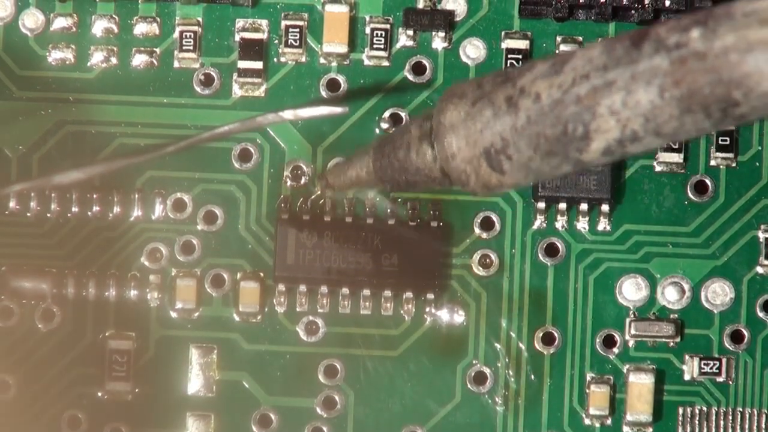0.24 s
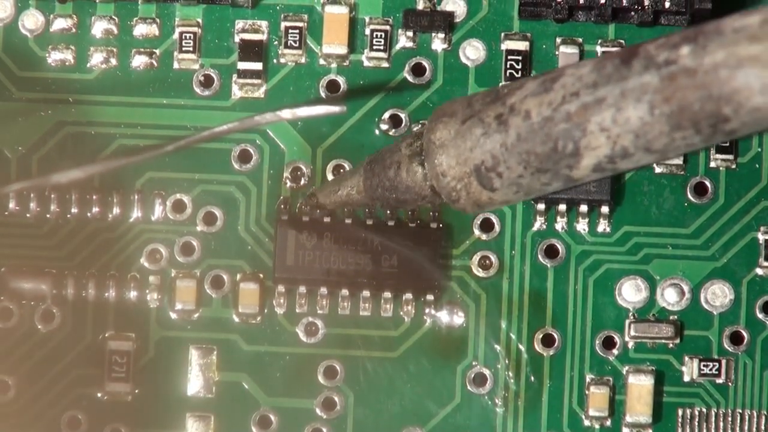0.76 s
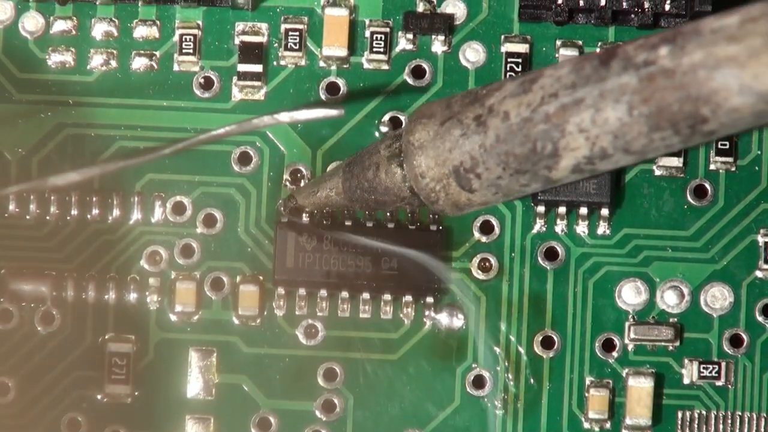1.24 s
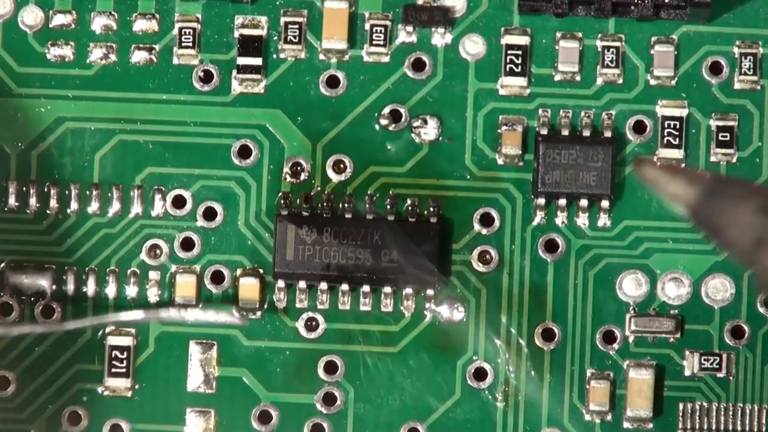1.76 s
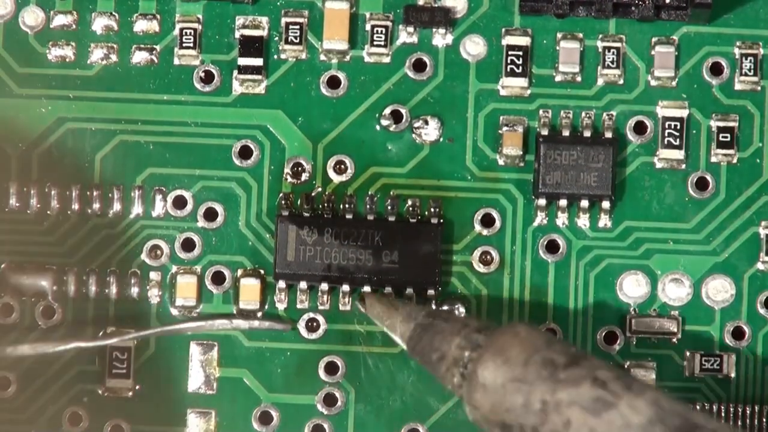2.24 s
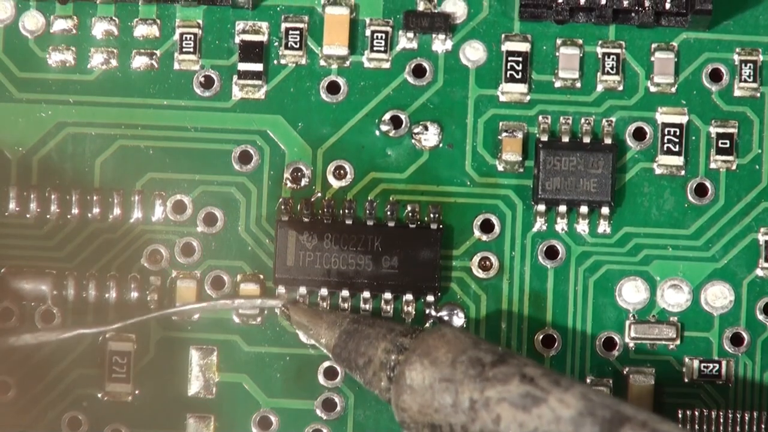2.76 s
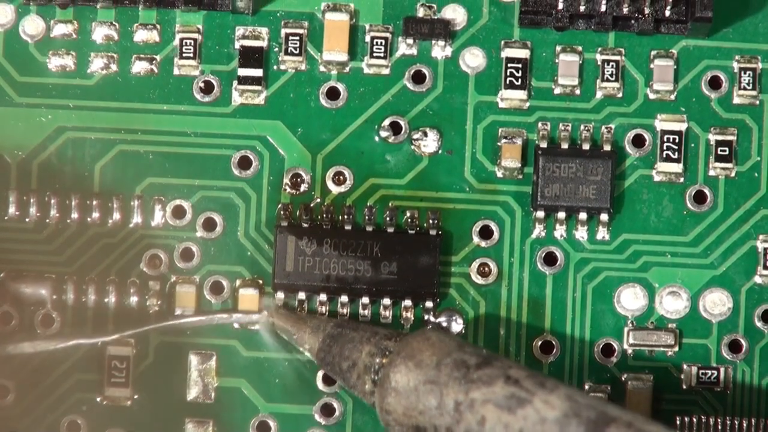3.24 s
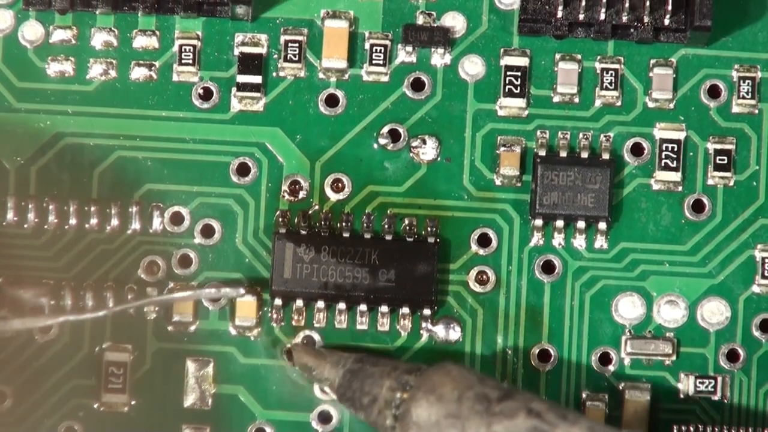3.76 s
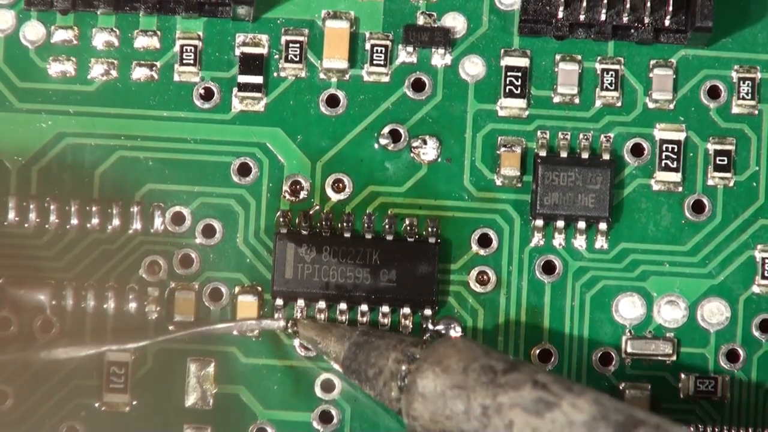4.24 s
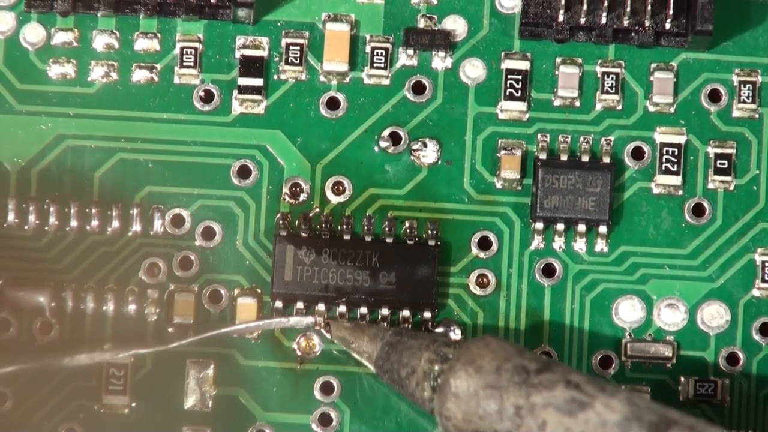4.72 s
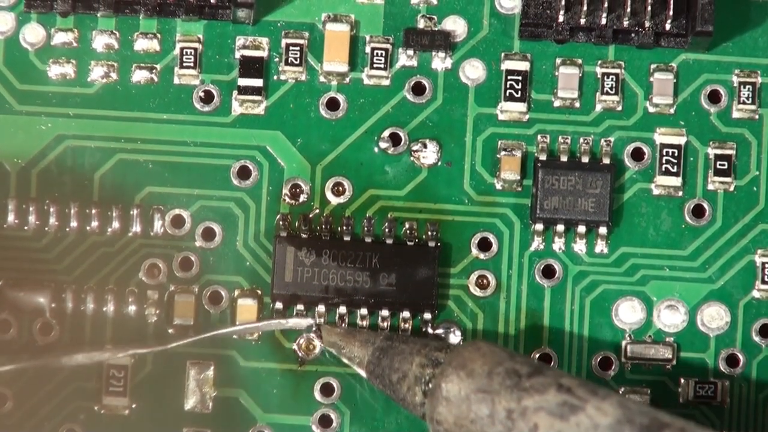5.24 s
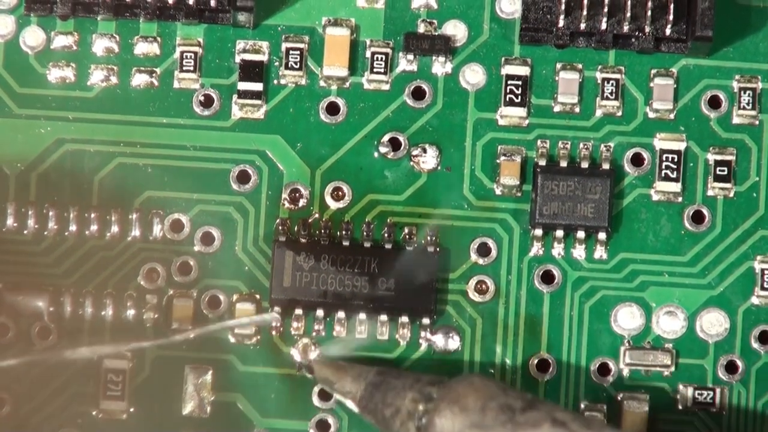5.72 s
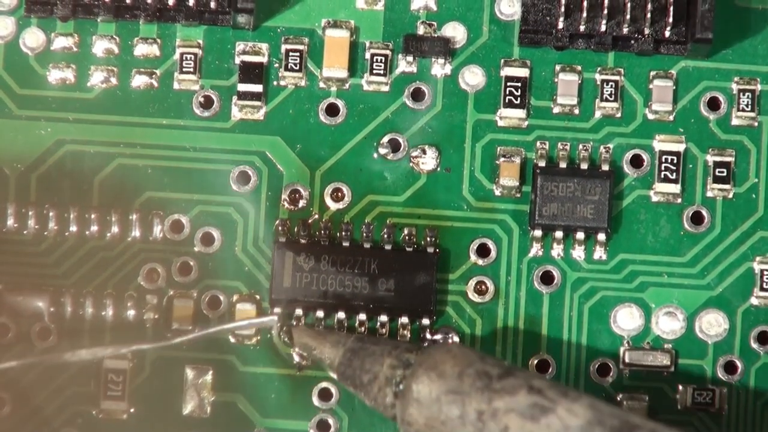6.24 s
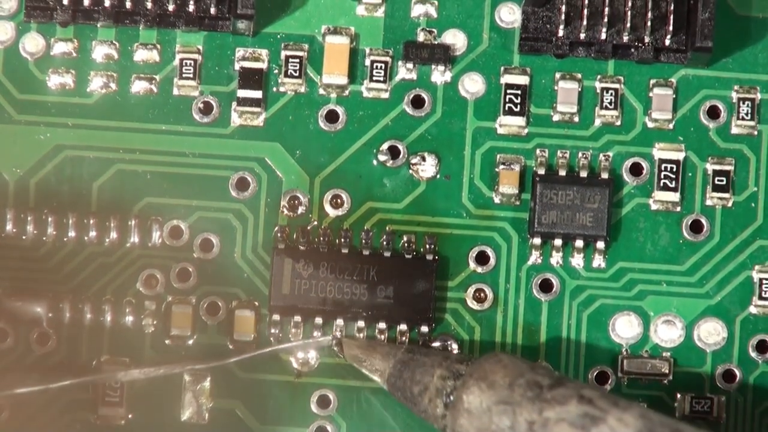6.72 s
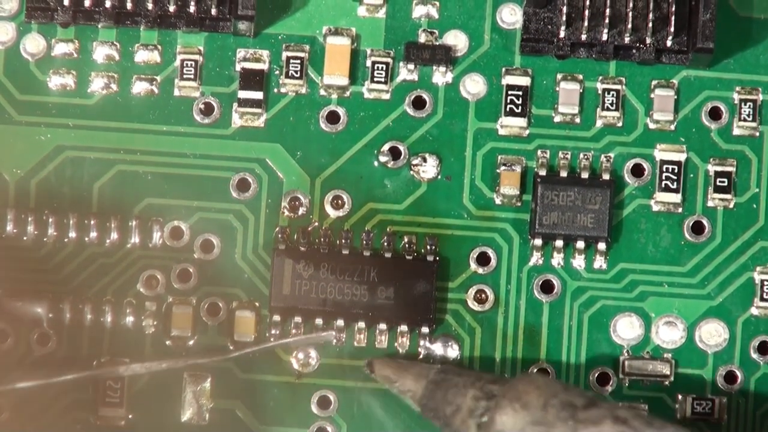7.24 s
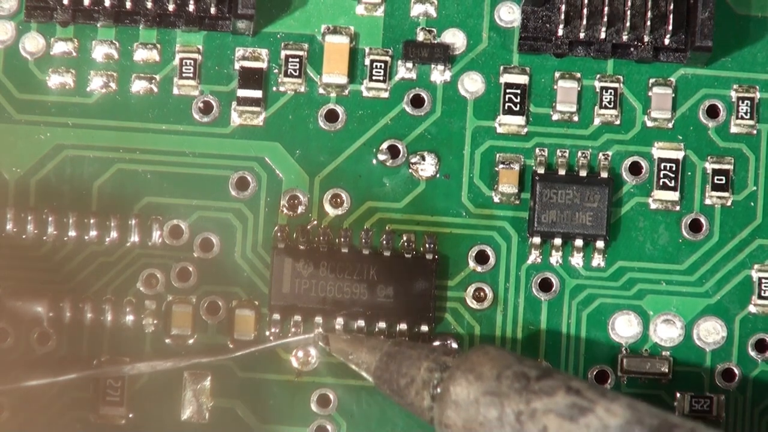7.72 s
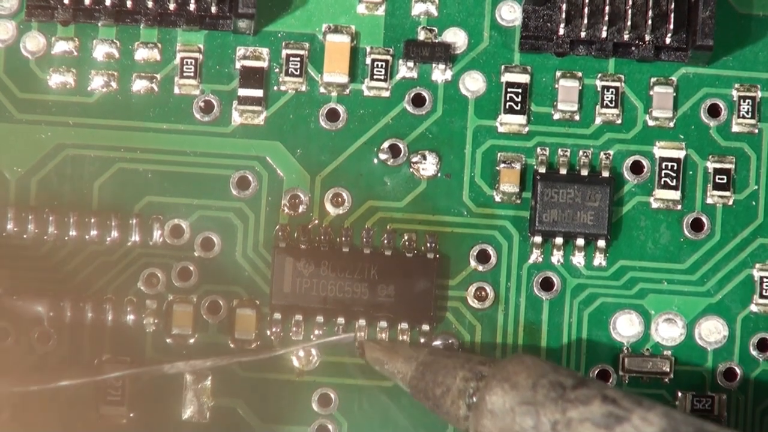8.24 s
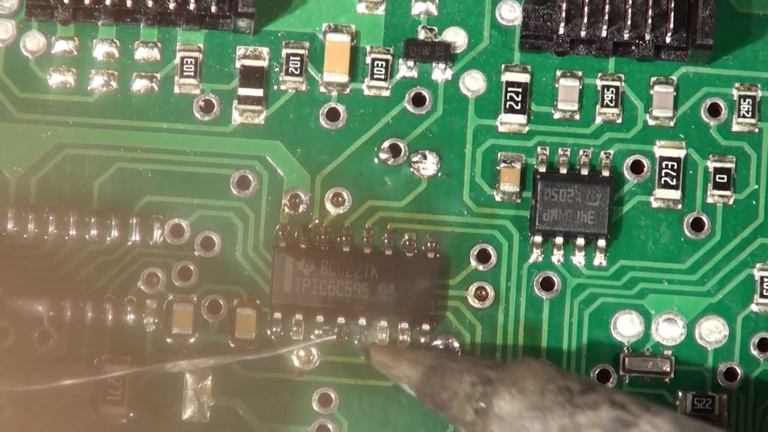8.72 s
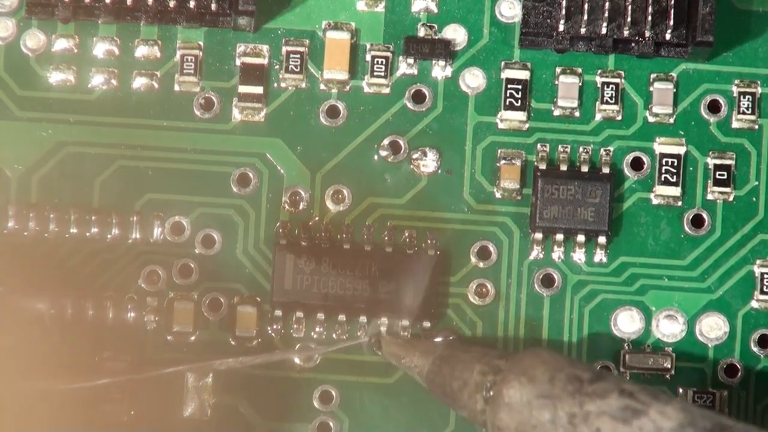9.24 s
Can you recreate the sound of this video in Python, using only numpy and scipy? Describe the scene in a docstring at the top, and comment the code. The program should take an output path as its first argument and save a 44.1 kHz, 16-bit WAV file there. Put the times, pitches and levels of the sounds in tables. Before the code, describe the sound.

Constant low electrical buzzing in a quiet room while a metal tip clicks lightly against chip pins, with one short flux fizz.

```python
"""Soldering at a bench

A mains transformer hums and buzzes over the hiss of the room and the microphone: steady tones over shaped noise.
The iron's tip ticks against the pins of a chip and the circuit board rings briefly: fading sine waves.
The bench takes a few soft bumps as the hands shift, the tip and the solder wire scuff, and the iron clinks once:
short bands of noise and a few more fading sines. A spot of flux fizzes once, as noise broken into tiny spurts."""
import sys
import numpy as np
from scipy import signal
from scipy.fft import rfft, irfft
from scipy.io import wavfile

SR = 44100
rng = np.random.default_rng(int(sys.argv[2]) if len(sys.argv) > 2 else 0)


def log_audio(samples):
    """Write samples as a 16-bit WAV file to the path given in sys.argv[1]."""
    # one column per channel
    frames = np.atleast_2d(samples).T
    # limit to full scale, then quantise
    limited = np.clip(frames, -1, 1)
    pcm = np.round(limited * 32767).astype(np.int16)
    wavfile.write(sys.argv[1], SR, pcm)


N = 418509
T = np.arange(N) / SR  # time in seconds
HZ = np.fft.rfftfreq(N, 1 / SR)  # the frequencies that make up a sound of full length

MAINS_HZ = 50.051
PULSE_S = 0.00776  # time of the first pulse of the transformer's core

# Touches of the iron's tip on the pins. Each row: start in seconds, level in dB rms over the first 10 ms
# (before it is shared between the channels), top of the band that the blow excites in Hz.
TAPS = [(0.7492, -43, 8000), (0.843, -45, 4500), (0.848, -47, 2400), (1.154, -47, 9000),
        (3.6957, -29, 7500), (3.811, -36, 1400), (4.602, -40.5, 3500), (5.1206, -41, 3400),
        (5.943, -41, 3900), (6.3945, -25.5, 5740), (6.6546, -45, 4500), (7.2755, -36, 9000),
        (7.903, -33, 4300), (8.237, -40.5, 3500), (8.981, -42, 2500)]


def amp(db):
    """Turns decibels into a plain multiplier."""
    return 10 ** (np.asarray(db) / 20)


def evened(x):
    """Scales a signal to an rms level of 1."""
    return x / np.sqrt(np.mean(x ** 2) + 1e-20)


def read(points, hz):
    """Reads between the points of a table, with frequency on a logarithmic axis as the ear hears it."""
    f, value = np.transpose(points)
    return np.interp(np.log(hz + 1), np.log(f + 1), value)


def add(mix, s, sound):
    """Adds a sound to the mix at time s in seconds, cut off at the end of the mix."""
    part = mix[..., round(s * SR):][..., :sound.shape[-1]]
    part += sound[..., :part.shape[-1]]


def noise(gain, size=N):
    """White noise coloured by a gain for each frequency."""
    return irfft(rfft(rng.standard_normal(size)) * gain, size)


def noise_band(centre_hz, octaves, size=N):
    """Noise gathered around one pitch, fading off smoothly to both sides."""
    hz = np.fft.rfftfreq(size, 1 / SR)
    distance = np.log2((hz + 1) / centre_hz) / octaves
    return noise(np.exp(-.5 * distance ** 2), size)


def ringing(modes, t):
    """A struck object: each mode is a sine wave that dies away at its own rate."""
    return sum(amp(db - 60 * t / t60) * np.sin(2 * np.pi * hz * t) for hz, db, t60 in modes)


def air(swell_db=0.04):
    """Steady hiss with a soft low rumble, common to both channels in the bass."""
    # Colour of the hiss. Each row: frequency in Hz, level in dB per Hz.
    hiss_colour = [(10, -92), (60, -85), (120, -82), (200, -77), (290, -77.5), (380, -83), (700, -84.3),
                   (1100, -86.4), (1600, -87.4), (2000, -90.3), (3300, -93), (6500, -96), (9000, -99.5),
                   (12200, -97.5), (14800, -100.5)]
    # Likeness of the two channels. Each row: frequency in Hz, likeness from 0 to 1.
    likeness = [(130, 1.0), (290, 0.98), (420, 0.18), (1400, 0.11), (4000, 0.13), (6500, 0.39),
                (11000, 0.23), (11600, 1)]
    # Thin rings in the hiss. Each row: frequency in Hz, width in Hz, height in dB above the hiss.
    whines = [(846, 11, 12), (1340, 26, 3), (2263, 36, 3), (6000, 67, 4), (8510, 37, 1), (9380, 48, 9.5),
              (10160, 64, 8.5), (11660, 50, 5.5)]
    level_db = read(hiss_colour, HZ)
    for hz, width, db in whines:
        level_db = level_db + db / (1 + (2 * (HZ - hz) / width) ** 2)
    gain = amp(level_db) * np.sqrt(SR / 2)  # from a level per Hz to a gain on white noise
    same = np.clip(read(likeness, HZ), 0, 1)
    mid = noise(gain * np.sqrt((1 + same) / 2))
    side = noise(gain * np.sqrt((1 - same) / 2))
    slow_swell = amp(swell_db * evened(noise(np.exp(-HZ / 10))))
    return np.array([mid + side, mid - side]) * slow_swell


def transformer(waver_db=0.33, spread=0.46, size=4096, count=180):
    """One mains cycle, repeated: a round pulse of the core and the thin buzz of its case."""
    # The core's pulse. Each row: multiple of the mains frequency, level in dB rms.
    hum = [(1, -74), (2, -48.4), (3, -50.2), (4, -47.2), (5, -56), (6, -48.1)]
    # How well the case radiates the overtones. Each row: frequency in Hz,
    # level of each overtone in dB rms before the uneven part is added.
    buzz = [(350, -80.5), (500, -74.5), (600, -65.5), (750, -66), (950, -73), (1450, -78), (1600, -68.5),
            (1700, -70), (1900, -81), (2600, -78.5), (3900, -85), (7000, -83.5), (9000, -93)]
    # Overtones that meet a resonance of the case and stand out.
    # Each row: multiple of the mains frequency, level in dB rms.
    resonant = [(9, -65), (11, -63.5), (13, -63), (20, -68), (21, -67), (24, -67), (25, -67), (31, -62),
                (45, -64.5), (48, -74), (51, -72.5), (54, -74), (89, -74), (91, -76)]
    # the overtones grow more uneven towards the treble
    uneven_db, uneven_hz = 5.5, 2500
    # the case is nearer the right channel, which shows most in the middle range
    pan_limit_db, centred_below_hz = -5, 850

    order = np.arange(count)
    hz = order * MAINS_HZ
    treble = hz ** 2 / (hz ** 2 + uneven_hz ** 2)
    above_bass = hz ** 2 / (hz ** 2 + centred_below_hz ** 2)
    level_db = read(buzz, hz) + uneven_db * treble * rng.uniform(-0.81, 1, count)
    pan_db = pan_limit_db * (1 - treble) * above_bass
    for k, db in resonant:
        level_db[k] = db

    # the buzz reaches each channel by many paths; the low hum arrives in step
    phase = 2 * np.pi * rng.random(count) + spread * (rng.random((2, count)) - .5) * 2
    for k, db in hum:
        level_db[k], phase[:, k] = db, 0
    channels = amp(np.array([pan_db, -pan_db]) / 2) * np.exp(1j * phase)
    channels = channels / abs(channels.mean(0))
    overtones = amp(level_db) * channels * (order > 0)  # order 0 is a constant, not a tone

    cycles = irfft(overtones, size) * size / np.sqrt(2)
    place = (T - PULSE_S) * MAINS_HZ % 1 * size
    repeated = np.array([np.interp(place, np.arange(size), cycle, period=size) for cycle in cycles])
    waver = amp(waver_db * evened(noise(np.exp(-HZ / 3))))
    return waver * repeated


def sputter(db=-62.5, centre_hz=6200, octaves=1.0, flare_at=0.69, flare_width=0.14):
    """A faint electrical hiss that flares late in every mains cycle, counted from the core's pulse."""
    cycle = (T - PULSE_S) * MAINS_HZ % 1
    flare = np.exp(-.5 * ((cycle - flare_at) / flare_width) ** 2)
    return amp(db) * evened(noise_band(centre_hz, octaves) * flare)


def room(x, gap_s=0.0027, size=12000):
    """Dense reflections from the bench and nearby walls, different in each channel."""
    # How long the echoes last. Each row: frequency in Hz, time to fall by 60 dB in seconds.
    echo_t60 = [(300, 0.043), (1500, 0.18), (4000, 0.19), (12000, 0.058)]
    signs = rng.choice([-1., 1.], (2, size))
    chosen = rng.random((2, size)) < .1  # a tenth of the moments carry an echo
    echoes = signs * chosen * (np.arange(size) > gap_s * SR)
    # each frequency dies away at its own rate
    hz, t, z = signal.stft(echoes, SR, nperseg=128)
    z = z * amp(-60 * t / read(echo_t60, hz)[:, None])
    tail = signal.istft(z, SR)[1]
    tail = tail / np.linalg.norm(tail, axis=1, keepdims=True)
    return signal.fftconvolve(x, tail, axes=1)[:, :N]


def swell(centre_hz, octaves, rise, t60, size=16384):
    """A contact with no clear ring: a band of noise that rises and dies quickly."""
    t = np.arange(size) / SR
    body = evened(noise_band(centre_hz, octaves, size))
    return body * np.minimum(t / rise, 1) * amp(-60 * np.maximum(t - rise, 0) / t60)


def bench():
    """The bench thuds under knocks and, faintly, under every tap; a harder blow is wider and quicker."""
    # Knocks of hands and tools. Each row: start in seconds, level in dB rms before the rise and fade,
    # centre in Hz, spread in octaves (wider is harder).
    knocks = [(1.408, -34.5, 210, .6), (1.52, -46, 500, 1.3), (1.7475, -38.5, 380, 1.55),
              (1.862, -41.5, 260, 2.2), (3.203, -42.5, 130, 1.15), (7.275, -37, 520, 1.35),
              (8.838, -47, 250, .6)]
    thud_db, thud_hz, thud_octaves = -18.5, 250, 0.75  # dB relative to the tap's own level
    rise_s, t60 = 0.007, 0.17  # the rise is that of a knock one octave wide
    out = np.zeros(N)
    thuds = [(s, db + thud_db, thud_hz, thud_octaves) for s, db, _ in TAPS]
    for s, db, centre_hz, octaves in list(knocks) + thuds:
        add(out, s, amp(db) * swell(centre_hz, octaves, rise_s / octaves, t60))
    return out


def scuffs():
    """The tip and the solder wire brush over the pins: soft bands of noise, lingering when slow."""
    # Each row: start in seconds, level in dB rms before the rise and fade, centre in Hz, rise in seconds.
    brushes = [(0.312, -55, 1600, .015), (.57, -56, 2700, .055), (1.372, -50, 1200, 0.031),
               (1.519, -40, 2500, 0.0014), (4.07, -51, 10000, .003)]
    octaves, shortest_t60, linger = 1, 0.1, 2.5  # t60 grows by this many rise times
    out = np.zeros(N)
    for s, db, centre_hz, rise in brushes:
        add(out, s, amp(db) * swell(centre_hz, octaves, rise, shortest_t60 + linger * rise))
    return out


def clink(start_s=7.276, db=-33, size=8000):
    """The iron's metal clinks once as it lands: its own short ring."""
    # Each row: frequency in Hz, level in dB relative to the clink's, time to fall by 60 dB in seconds.
    metal = [(307, -4, 0.11), (1150, -3, .06), (2035, -7, 0.054), (3620, -1.5, .028), (8500, -15, 0.065)]
    out = np.zeros(N)
    add(out, start_s, amp(db) * ringing(metal, np.arange(size) / SR))
    return out


def flux(start_s=1.535, end_s=1.633, end_db=-45.5, grain_db=2):
    """Flux boils harder and harder until it is spent: a bright hiss in tiny spurts that grows and stops."""
    # Colour of the fizz. Each row: frequency in Hz, relative level in dB per Hz.
    colour = [(500, -13), (2500, 2), (5000, 1), (8000, 6), (11000, 0), (15000, 0)]
    grow_db_per_s, edge_db_per_s = 65, 550  # the edge makes the quick start and stop
    outside_s = abs(T - np.clip(T, start_s, end_s))
    level_db = end_db - grow_db_per_s * np.maximum(end_s - T, 0) - edge_db_per_s * outside_s
    spurts = amp(grain_db * evened(noise(np.exp(-HZ / 300))))
    fizz = evened(spurts * noise(amp(read(colour, HZ))))
    return amp(np.maximum(level_db, -200)) * fizz


def taps(crack_db=-12, crack_t60=0.059, contact_s=0.00044, size=6000):
    """Each touch rings the board's modes; a harder touch reaches the higher ones."""
    # The board under the tip. Each row: frequency in Hz, relative level in dB, time to fall by 60 dB in seconds.
    board = [(880, -24, 0.036), (1009, -2, 0.027), (1367, -4.5, 0.061), (1502, 3, 0.02),
             (1657, -1.5, 0.018), (1930, -17, 0.04), (2130, -22, .035), (2440, -13.5, 0.044),
             (2847, -8.5, 0.025), (3690, -14.5, 0.043), (4190, 0, .013), (5090, -7, 0.017),
             (6630, -13, 0.016), (7400, -23, .02), (10000, -27, 0.009), (11100, -10, .007)]
    # the iron moves from the chip's far row of pins to the near row, where the board rings lower
    row_change_s, far_row_low_hz, near_row_low_hz = 2, 1520, 820
    pan_db = -0.9  # left channel against right
    t, out = np.arange(size) / SR, np.zeros((2, N))
    ring = ringing(board, t)
    for s, db, top_hz in TAPS:
        crack = amp(crack_db - 60 * t / crack_t60) * rng.standard_normal(size)
        tap = (ring + crack) * (1 - np.exp(-t / contact_s))
        # so small a board radiates little bass
        low_hz = far_row_low_hz if s < row_change_s else near_row_low_hz
        tap = signal.lfilter(*signal.butter(4, low_hz, "high", fs=SR), tap)
        tap = signal.lfilter(*signal.butter(2, min(top_hz, SR / 2 - 1000), fs=SR), tap)
        tap = tap / np.std(tap[t < .01])
        add(out, s, amp([[db + pan_db / 2], [db - pan_db / 2]]) * tap)
    return out


def scene(room_db=-13, bump_room_db=-14):
    """The work on the board, close by and with its echoes, over the hum and hiss."""
    ticks = taps()
    handling = bench() + scuffs() + clink() + flux()
    echo = room(amp(room_db) * ticks + amp(bump_room_db) * handling)
    return ticks + handling + echo + transformer() + sputter() + air()


def record(dry, edge_hz=14900):
    """A steep low-pass filter removes the treble above the edge."""
    lowpass = signal.firwin(1023, edge_hz, window=("kaiser", 9), fs=SR)
    return signal.oaconvolve(dry, lowpass[None], "same", axes=1)


dry = scene()
out = record(dry)
log_audio(out)
```